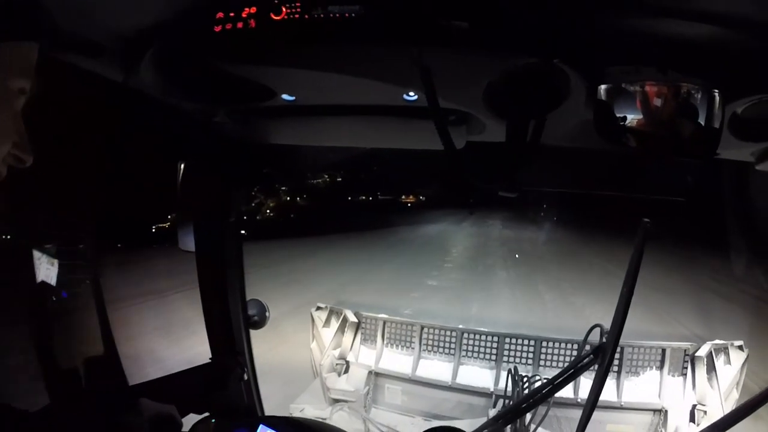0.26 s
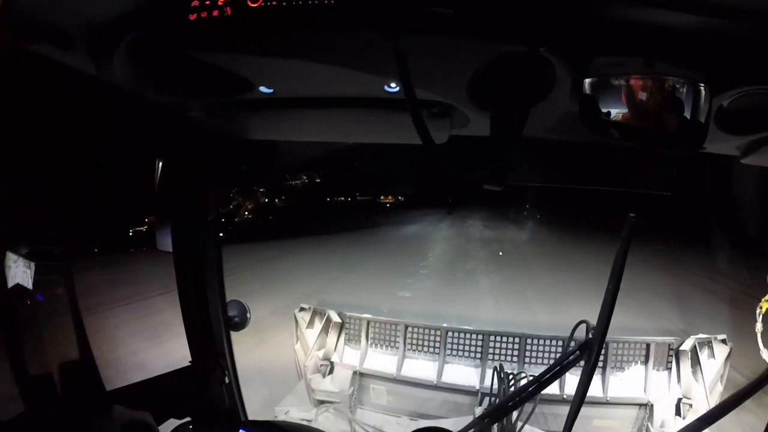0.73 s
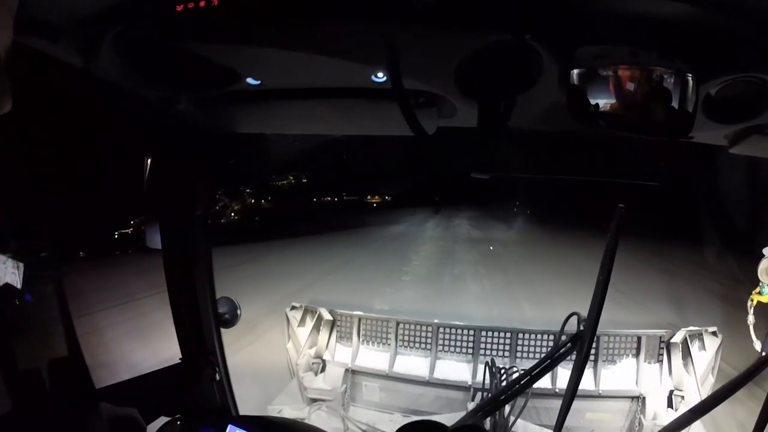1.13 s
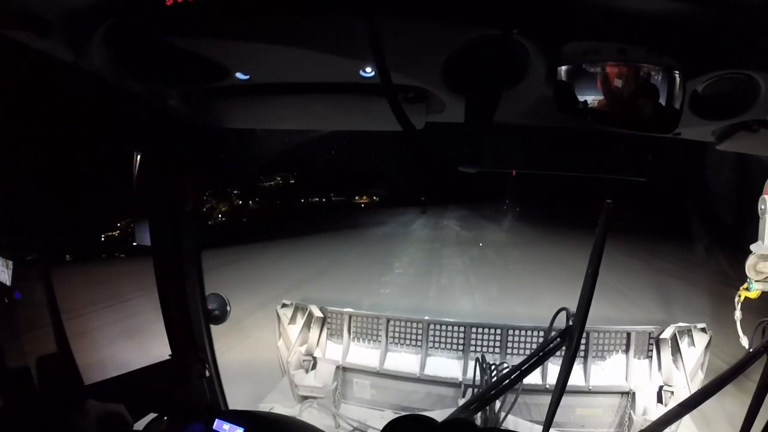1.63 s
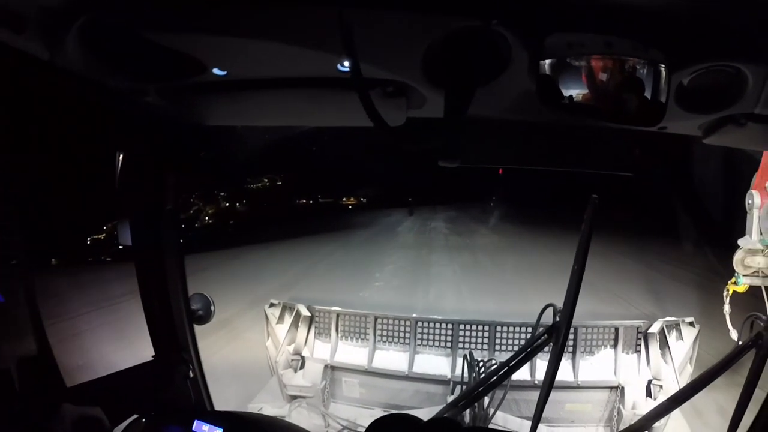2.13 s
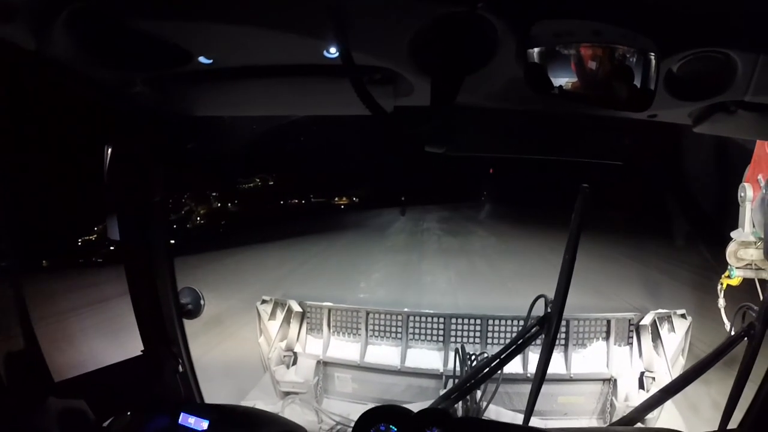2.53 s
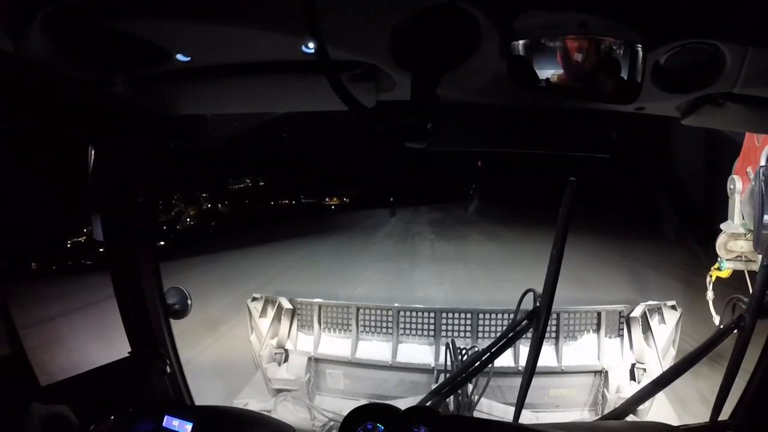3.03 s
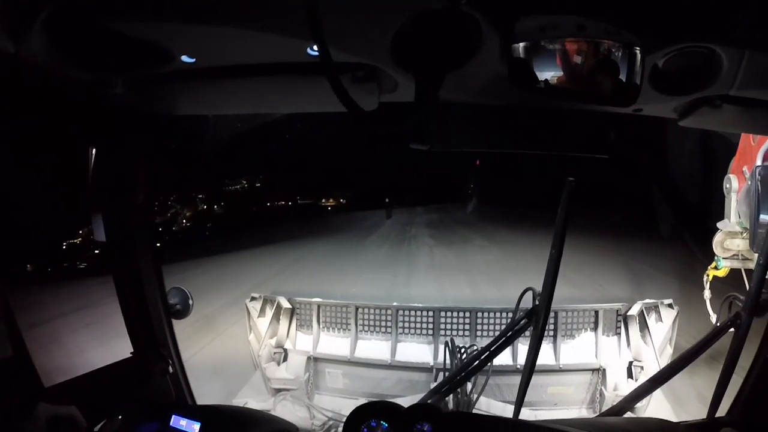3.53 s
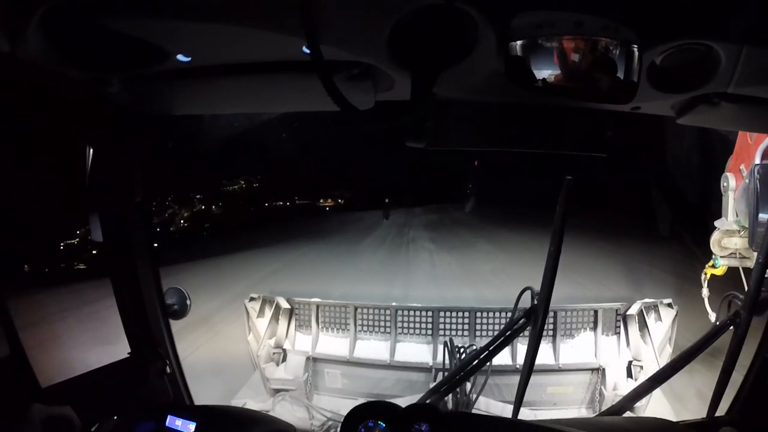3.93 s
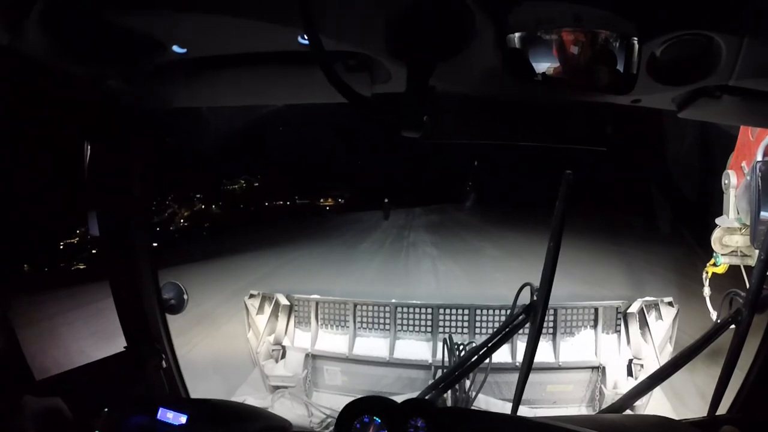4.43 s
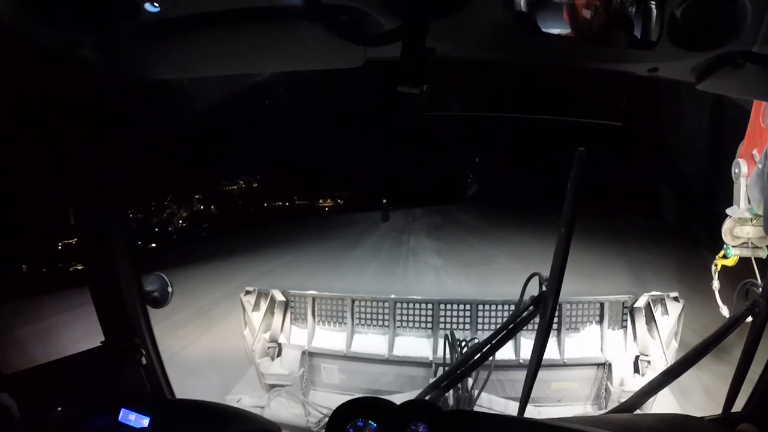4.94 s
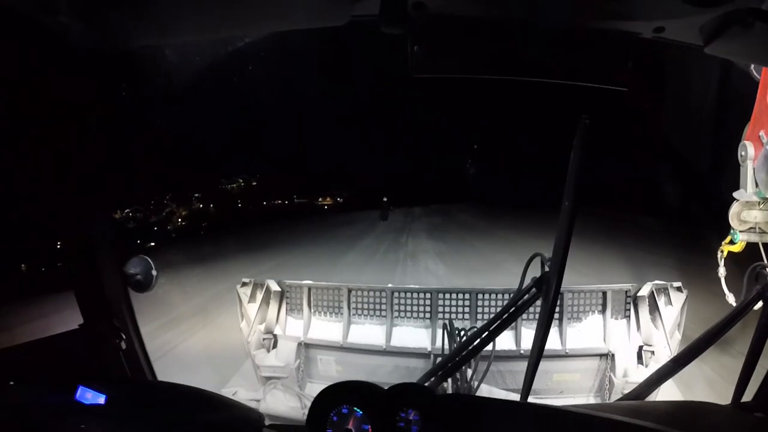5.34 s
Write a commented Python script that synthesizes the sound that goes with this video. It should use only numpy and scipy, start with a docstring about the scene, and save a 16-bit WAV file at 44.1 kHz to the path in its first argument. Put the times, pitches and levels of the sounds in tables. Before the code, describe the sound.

Close microphone inside a vibrating cab on snow at night: continuous heavy engine drone around a very low pitch, with rough overtones and muffled clatter. Track cleats flutter underneath, snow scraping is strongest at first and eases midway, and thin hydraulic tones waver. Brief buzzes, panel hums and a few dry ticks come and go; the engine hardens toward the end, without stopping.

```python
"""The six-cylinder diesel of a snow groomer at nearly steady revs, heard by a microphone inside the cab.
Its boom and overtones follow the crank; clatter and valve taps are noise patterned over two turns.
Hydraulic drives whine as wavering tones, and the tracks beat together as two throbs and rock the cab.
Beyond the walls, filtered noise makes the scraped snow and the roar.
Close by, fittings buzz, panels hum and trim ticks now and then."""
import sys
import numpy as np
from scipy import signal
from scipy.fft import rfft, irfft
from scipy.io import wavfile
from scipy.ndimage import uniform_filter1d, map_coordinates

SR = 44100
rng = np.random.default_rng(int(sys.argv[2]) if len(sys.argv) > 2 else 0)


def put_to_file(sound):
    """Save the sound as 16-bit audio at rate SR, in the file named by the first command-line argument."""
    columns = np.atleast_2d(sound).T  # one column per channel
    safe = np.clip(columns, -1, 1)
    whole_steps = np.round(safe * 32767)
    wavfile.write(sys.argv[1], SR, whole_steps.astype(np.int16))


N = 245637
TIME = np.arange(N) / SR  # s
FREQ = np.fft.rfftfreq(N, 1 / SR)  # Hz

# engine speed: (time [s], firing rate [Hz])
FIRING_RATE = [(0, 68.25), (0.2, 68.12), (0.45, 67.74), (0.7, 67.86), (1.25, 68.86), (1.7, 68.59),
               (2.3, 69.26), (2.9, 68.94), (3.3, 68.58), (3.7, 68.78), (4.25, 68.82), (4.8, 68.55),
               (5.2, 68.29), (5.57, 68.31)]
# load on the engine about its usual load: (time [s], level [dB])
ENGINE_LOAD = [(0, -1.5), (.35, 2.5), (.75, 2.5), (1.1, -1.7), (1.6, 1.2), (2.2, -3), (3.5, 0.6), (4.2, 0),
               (4.8, 1.7), (5.25, 3), (5.57, 3)]
# oil pressure of the drive: (time [s], level [dB])
OIL_PRESSURE = [(0, -13), (1.6, -3.5), (2.35, 1), (3.8, 4), (4.95, 2.5), (5.57, 4.5)]
# engine overtones at zero strain, before the common level OVERTONES_DB:
# (multiple of crank speed, level [dB], swell with strain [dB per dB])
ENGINE_OVERTONES = [(6, -36, 1.3), (9, -32.3, .6), (10, -46, 0), (11, -40.5, 0), (12, -45, 0), (13, -48, 0),
                    (15.5, -47, 0), (17, -49, 0), (19, -49, 0), (25.5, -52, 0), (28, -55, 0),
                    (28.5, -51, .5), (30, -57, 0), (36, -53, .5), (39, -56, 0), (40, -56, 0), (42, -57, 0),
                    (43.5, -45.5, .8), (46, -58, .5), (47, -58, .5), (53.5, -58, 0), (54, -59, 0),
                    (60, -61, 0), (61, -62, 0), (76, -61, 1), (84.5, -64, 0), (90, -61, 1.5), (98, -63, 0),
                    (102, -63, 1), (114, -65, 0), (131.5, -65, 0), (148, -66, 0)]
# knock of injectors and valves before the cab's colour: (frequency [Hz], density [dB per Hz])
CLATTER_COLOUR = [(100, -74), (300, -66), (800, -72), (1500, -79), (2300, -84), (3200, -89), (5000, -102),
                  (10000, -120)]
# valve gear tapping before the cab's colour: (frequency [Hz], density [dB per Hz])
VALVE_COLOUR = [(500, -100), (1200, -81.5), (2200, -81.5), (3200, -86), (4500, -94.5), (8000, -108),
                (15000, -120)]
# pump whine: (time [s], first harmonic level [dB], second harmonic level [dB])
PUMP_WHINE = [(0, -54, -47), (1.1, -54, -49), (1.6, -47, -40), (2.05, -50, -45), (2.35, -41, -44.5),
              (2.7, -45, -51), (3.3, -41, -43), (4, -44, -47), (4.8, -33.5, -43.5), (5.57, -33.5, -48)]
# hydraulic motor: (time [s], pitch [Hz], level of the second harmonic [dB])
MOTOR_WHINE = [(0, 255, -42), (.55, 254.4, -40.5), (1.3, 257, -44), (1.85, 249.6, -35), (2.1, 254.6, -45.5),
               (3.3, 250.6, -46), (5.57, 246.4, -50)]
# tiller drive: (time [s], pitch [Hz], level [dB])
TILLER_WHINE = [(0, 403, -42), (.7, 406.7, -43), (1.1, 422, -45), (1.6, 434.4, -50), (2.3, 440, -49),
                (3, 434.2, -45.5), (4.2, 433.2, -41), (5.57, 422.2, -42)]
# throb of the outer track's cleats: (time [s], level [dB])
CLEAT_THROB = [(0, -12.5), (.6, -12), (1.1, -14.5), (1.45, -17), (1.85, -16), (2.15, -9), (2.7, -13),
               (3.2, -12.5), (4.05, -8.5), (4.6, -13), (5.1, -15.5), (5.5, -10.5)]
# inner track against the outer, weaker in the turn or out of it: (time [s], level [dB])
INNER_TRACK = [(0, -1.5), (.85, -5.5), (1.45, -12.5), (1.85, -3.5), (2.2, -25), (3.1, -21), (4.4, -9),
               (5.57, -12.5)]
# moments when the two tracks strike in turn and work against each other: (time [s])
OUT_OF_STEP = [.33, .845, 1.43, 1.885, 2.92, 3.73, 4.42, 5.16, 5.9]
# the cab rocking on its mounts: (frequency [Hz], half width at -6 dB [Hz], level [dB])
CAB_MOUNTS = [(17.47, 0.76, -26), (35.54, 1.0, -30)]
# snow scraped sideways under the tracks: (time [s], level [dB])
SCRAPE_LEVEL = [(0, 3), (2.3, -5), (3, -9.5), (5.57, -3)]
# colour of that scrape before its level and the cab's colour: (frequency [Hz], density [dB per Hz])
SCRAPED_SNOW = [(150, -94), (260, -59), (420, -62), (580, -68.5), (850, -72), (1200, -87), (3000, -110)]
# roar of tracks, tiller and fan before the cab's colour: (frequency [Hz], density [dB per Hz])
ROAR_COLOUR = [(10, -45), (20, -39.5), (36, -36.5), (52, -43.5), (90, -44), (120, -50), (175, -52.5),
               (260, -56.5), (400, -57), (560, -66.5), (1100, -71.5), (2500, -78), (4700, -88), (8200, -98),
               (15000, -106)]
# swell of the hiss, followed in part by the rush: (time [s], level [dB])
HISS_LEVEL = [(0, -1.6), (4.4, -1.5), (5.57, 2)]
# resonances and dips of the cab: (frequency [Hz], half width at 1/e [Hz], gain [dB])
CAB_RESONANCES = [(61, 12, -1.5), (73, 5.1, 0.5), (109.6, 3.5, -2), (170.5, 12, -6), (261, 18, 0.5),
                  (301, 4.9, -5.5), (648.5, 12, 7), (757, 40, -1), (960, 104, 3), (1245, 16, 2.5),
                  (1364, 35, 4.5), (1446, 123, -3), (1600, 50, -1.5), (1694, 42, 5), (1933, 28, 3),
                  (2055, 25, 3.5), (2290, 120, 2), (2740, 70, 2.5), (3060, 180, 3), (3530, 140, -1.5),
                  (3930, 410, 3), (7240, 400, 2.5), (9300, 440, 2.5)]
# fittings that buzz for a while:
# (time of the strongest [s], half length [s], frequency [Hz], half width at -6 dB [Hz], level [dB])
BUZZING_FITTINGS = [(.05, 0.16, 3820, 220, -51), (.6, .35, 2720, 44, -58), (.7, 0.47, 3100, 30, -62),
                    (.75, 0.32, 2170, 150, -49), (1, .25, 830, 13, -46), (1.8, 0.25, 256, 14, -38),
                    (4.65, 0.32, 255, 14, -36.5), (1.746, .3, 500, 14, -46), (3.749, 0.42, 348, 16, -38.5),
                    (1.8, 0.78, 2370, 43, -57), (1.901, 0.22, 1340, 45, -50), (2.25, 0.39, 3840, 90, -58),
                    (2.65, 0.29, 1360, 60, -53), (3.103, .5, 2430, 280, -53), (3.7, 0.71, 3374, 25, -57.5),
                    (4.002, 0.38, 964, 23.4, -53), (4.9, 0.33, 3000, 39, -57), (5.1, 0.99, 2053, 24, -50),
                    (5.3, .4, 2130, 25, -52), (5.4, 0.31, 1087, 22, -46.5), (5.45, .3, 2350, 150, -50)]
# panels that hum for a while as the frame flexes:
# (time of the strongest [s], half length [s], frequency [Hz], level [dB])
HUMMING_PANELS = [(0.507, 0.41, 290, -36), (.8, 0.25, 250.3, -32), (2.293, 0.22, 589, -41),
                  (2.6, 0.46, 155.6, -36), (3.603, 0.87, 157.2, -44.5), (3.797, 0.3, 391.6, -37),
                  (5.35, 0.36, 387, -40), (5.35, 0.39, 1048, -50), (5.1, .5, 800, -49),
                  (5.303, 0.27, 156.4, -41)]
# ticks of loose trim: (time [s], level [dB], decay time [s])
TRIM_TICKS = [(.642, -54, .003), (1.387, -52, 0.0034), (1.503, -54, .003), (1.651, -38, 0.0028),
              (1.654, -39.5, 0.016), (2.201, -43, 0.007), (2.679, -41, 0.0047), (3.065, -54, 0.0034),
              (4.121, -50, .003), (5.462, -52, 0.0059)]
# relative colour of the ticks: (frequency [Hz], level [dB])
TRIM_COLOUR = [(800, 2), (3000, 14.5), (5500, 3.5), (9000, -1), (14000, -14)]

CYLINDERS = 6
BOOM_DB, BOOM_PER_LOAD = -17, 0.81  # boom at the usual load; swell in dB per dB
STRAIN_DB, STRAIN_PER_LOAD, STRAIN_PER_PRESSURE = -0.7, 0.51, 0.53  # base in dB; growth in dB per dB
OVERTONES_DB = -0.5  # common level of all overtones
VALVE_DECAY_S, VALVE_SPREAD_DB = 0.0018, 2  # ring of one tap; how unequal the valves are
PUMP_ORDER = 14.45  # piston strokes per crank turn
CLEAT_HZ, CLEAT_SLIP = 23.47, 0.022  # cleat rate; spread of the slip in cleat spacings
RIPPLE_DB = 3  # spread of the narrow resonances in rush and hiss
BUZZ_DEPTH = 0.15  # how deeply each firing pulses a buzz, 0-1
PANEL_FLUTTER = 0.005  # wavers per cycle of the hum
TOP_HZ = 15200  # upper limit of the microphone


def undb(db):
    """Decibels to gain."""
    return 10 ** (np.asarray(db) / 20)


def curves(table):
    """Each column of a (time, ..) table, sample by sample."""
    times, *columns = np.transpose(table)
    return [np.interp(TIME, times, column) for column in columns]


def slope(points):
    """dB at every frequency, interpolated over log frequency."""
    hz, db = np.transpose(points)
    return np.interp(np.log(FREQ + 1), np.log(hz), db)


def colour(noise, db):
    """Filter white noise to a level in dB per Hz."""
    return irfft(rfft(noise) * undb(db), N) * np.sqrt(SR / 2)


def walk(rate):
    """Smooth chance with spread 1, changing about rate times a second."""
    size = 2 ** 12
    hz = np.arange(size // 2 + 1) * SR / N
    slow = irfft(rfft(rng.standard_normal(size)) * np.exp(-(hz / rate) ** 2))
    return np.interp(np.linspace(0, size - 1, N), np.arange(size), slow / slow.std())


def tone(turns, db, rough):
    """A sine near the given rms level whose strength and phase flutter."""
    angle = 2 * np.pi * (turns + rng.random())
    steady = (1 + rough * walk(20.0)) * np.sin(angle)
    astray = rough * walk(5.6) * np.cos(angle)
    return np.sqrt(2) * undb(db) * (steady + astray)


def ringing(hz, width):
    """One resonance shaken at random, rms 1."""
    ring = colour(rng.standard_normal(N), -20 * np.log10(1 + ((FREQ - hz) / width) ** 2))
    return ring / ring.std()


def pulsing(crank, depth):
    """A gain that rises and falls once with every firing."""
    return 1 + np.clip(depth, 0, 1) * np.cos(np.pi * CYLINDERS * crank)


def cab():
    """The cab's colour in dB, shared by clatter, valves, scrape and roar."""
    return sum(db * np.exp(-((FREQ - hz) / width) ** 2) for hz, width, db in CAB_RESONANCES)


def drone(crank, boom_db, strain_db):
    """Three firings a turn make the boom; unequal cylinders and gears add the overtones."""
    sound = tone(crank * CYLINDERS / 2, boom_db, rough=.02)
    for order, db, swell in ENGINE_OVERTONES:
        sound = sound + tone(order * crank, db + OVERTONES_DB + swell * strain_db, rough=0.04)
    return sound


def clatter(crank, cab_db):
    """Every cylinder has its own knock, and the six come round again each two turns."""
    size = 3840  # points in the pattern
    cycle = crank / 2 % 1
    knocks = map_coordinates(rng.standard_normal(size), [cycle * size], order=3, mode="grid-wrap")
    cylinder = (cycle * CYLINDERS).astype(int)
    strength = undb(1.0 * rng.standard_normal(CYLINDERS))[cylinder]
    # the cab walls round each firing off into a swell
    knocks = knocks * strength * pulsing(crank, depth=0.06) * undb(0.29 * walk(13))
    return colour(knocks / knocks.std(), slope(CLATTER_COLOUR) + cab_db)


def valves(crank, firing_hz, cab_db):
    """Two short gritty taps per cylinder, each with its own strength and place in the cycle."""
    count = 2 * CYLINDERS
    cycle_s = CYLINDERS / firing_hz
    tapping = 0
    for k, (offset, size) in enumerate(rng.standard_normal((count, 2))):
        since_s = (crank / 2 - (k + .3 * offset) / count) % 1 * cycle_s
        tapping = tapping + undb(VALVE_SPREAD_DB * size) * np.exp(-since_s / VALVE_DECAY_S)
    taps = tapping * rng.standard_normal(N)
    return colour(taps / taps.std(), slope(VALVE_COLOUR) + cab_db)


def hydraulics(crank):
    """The geared pump whines cleanly; the motor and tiller drive run at their own pace."""
    pump = sum(tone(harmonic * PUMP_ORDER * crank, db, rough=.06)
               for harmonic, db in enumerate(curves(PUMP_WHINE), 1))
    motor_hz, motor_db = curves(MOTOR_WHINE)
    turns = np.cumsum(motor_hz) / SR
    motor = tone(turns, motor_db - 5.0, rough=0.4) + tone(2 * turns, motor_db, rough=0.12)
    tiller_hz, tiller_db = curves(TILLER_WHINE)
    tiller = tone(np.cumsum(tiller_hz) / SR, tiller_db, rough=0.36)
    return pump + motor + tiller


def tracks():
    """Cleats of both tracks throb through the frame and beat together while the cab rocks on its mounts."""
    (inner_db,), (throb_db,) = curves(INNER_TRACK), curves(CLEAT_THROB)
    # the inner track loses one cleat between moments; half a cleat puts it out of step
    moments = [2 * OUT_OF_STEP[0] - OUT_OF_STEP[1], *OUT_OF_STEP]
    lag = np.interp(TIME, moments, np.arange(len(moments))) + .5
    outer = CLEAT_HZ * TIME + CLEAT_SLIP * walk(2.1) + rng.random()
    throb = np.sin(2 * np.pi * outer) + undb(inner_db) * np.sin(2 * np.pi * (outer - lag))
    rocking = sum(undb(db) * ringing(hz, width) for hz, width, db in CAB_MOUNTS)
    return np.sqrt(2) * undb(throb_db) * throb + rocking


def scrape(cab_db):
    """The tracks shear the snow sideways: a low, uneven band of noise."""
    (db,) = curves(SCRAPE_LEVEL)
    snow = colour(rng.standard_normal(N), slope(SCRAPED_SNOW) + cab_db)
    return snow * undb(db + 0.46 * walk(6.5))


def narrow_resonances():
    """A random ripple over frequency, at full spread 1 in the low treble."""
    ripple = uniform_filter1d(uniform_filter1d(rng.standard_normal(len(FREQ)), size=170), size=170)
    return np.interp(FREQ, [700, 2000, 3200, 5000], [0, 1, 1, .7]) * ripple / ripple.std()


def shifting(db, count):
    """Noise whose narrow resonances come and go as the cab flexes."""
    weights = np.array([undb(5.0 * walk(1.0)) for _ in range(count)])
    weights = weights / np.sqrt((weights ** 2).sum(axis=0))  # constant total power
    return sum(weight * colour(rng.standard_normal(N), db + RIPPLE_DB * narrow_resonances())
               for weight in weights)


def roar(crank, hiss_db, cab_db):
    """Snow churns unevenly, air rushes with a slight firing pulse, and a fine hiss flickers on top."""
    low = 1 / (1 + (FREQ / 600) ** 4)
    high = 1 - 1 / (1 + (FREQ / 5000) ** 4)
    shares = np.maximum([low, 1 - low - high, high], 1e-9)  # power shares of the three bands
    churn_db, rush_db, top_db = slope(ROAR_COLOUR) + cab_db + 10 * np.log10(shares)
    churn = colour(rng.standard_normal(N), churn_db) * undb(.5 * walk(10.0))
    rush = shifting(rush_db, count=4) * pulsing(crank, depth=0.03)
    rush = rush * undb(0.37 * hiss_db + 0.42 * walk(9.4))
    hiss = shifting(top_db, count=3) * undb(hiss_db + 0.57 * walk(20) + 1.0 * walk(120))
    return churn + rush + hiss


def buzzes(crank):
    """Loose fittings chatter in narrow bands of noise, pulsed by the firings, and settle again."""
    sound = 0
    for s, length, hz, width, db in BUZZING_FITTINGS:
        swell = np.exp(-((TIME - s) / length) ** 2)
        sound = sound + undb(db) * swell * ringing(hz, width)
    return sound * pulsing(crank, BUZZ_DEPTH)


def panels():
    """Each panel swells into a wavering hum and settles again; the higher ones flutter faster."""
    hum = 0
    for s, length, hz, db in HUMMING_PANELS:
        swell = np.exp(-((TIME - s) / length) ** 2)
        turns = hz * TIME + 0.12 * walk(PANEL_FLUTTER * hz)
        hum = hum + swell * tone(turns, db, rough=0.091)
    return hum


def trim():
    """Short dry ticks from the cab lining: noise that starts at once and dies away."""
    blows = sum(undb(db) * (TIME >= s) * np.exp(-np.abs(TIME - s) / decay) for s, db, decay in TRIM_TICKS)
    crack = colour(rng.standard_normal(N), slope(TRIM_COLOUR))
    return blows * crack / crack.std()


def scene():
    """Load swells the boom; load and oil pressure harden the engine; the running gear sounds around it."""
    (load_db,), (pressure_db,), (hiss_db,) = curves(ENGINE_LOAD), curves(OIL_PRESSURE), curves(HISS_LEVEL)
    (firing_hz,) = curves(FIRING_RATE)
    crank = np.cumsum(firing_hz) / SR / (CYLINDERS / 2)  # turns
    strain_db = STRAIN_DB + STRAIN_PER_LOAD * load_db + STRAIN_PER_PRESSURE * pressure_db
    cab_db = cab()
    engine = drone(crank, BOOM_DB + BOOM_PER_LOAD * load_db, strain_db)
    engine = engine + clatter(crank, cab_db) * undb(0.12 * strain_db)
    engine = engine + valves(crank, firing_hz, cab_db)
    running_gear = hydraulics(crank) + tracks() + scrape(cab_db) + roar(crank, hiss_db, cab_db)
    fittings = buzzes(crank) + panels() + trim()
    return (engine + running_gear + fittings)[None]


def record(dry):
    """The cab microphone drops the slowest sway, rounds the highest peaks and cuts the top."""
    fade = np.clip(np.minimum(TIME, TIME[-1] - TIME) / .006, 0, 1)  # 6 ms at each end
    faded = dry * np.sin(fade * np.pi / 2) ** 2
    sound = signal.sosfilt(signal.butter(4, 10, "high", fs=SR, output="sos"), faded)
    sound = sound / (1 + (sound / .9) ** 10) ** (1 / 10)  # soft limit at 0.9
    return signal.sosfilt(signal.ellip(8, .2, 70, TOP_HZ, fs=SR, output="sos"), sound)


dry = scene()
out = record(dry)
put_to_file(out)
```